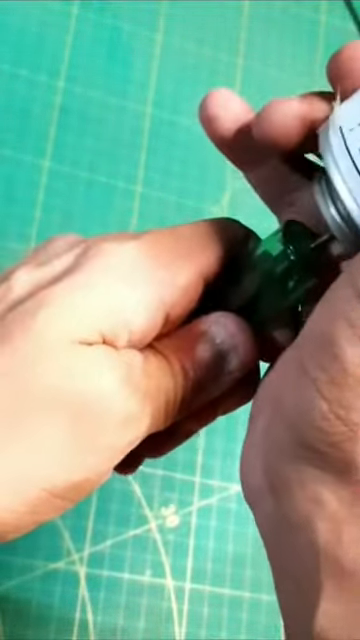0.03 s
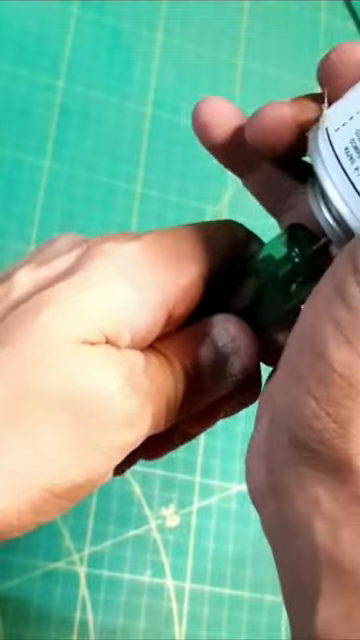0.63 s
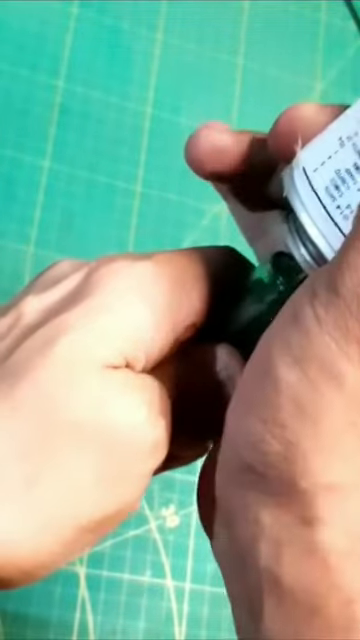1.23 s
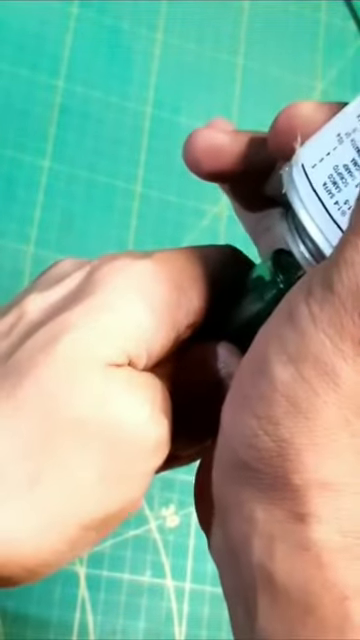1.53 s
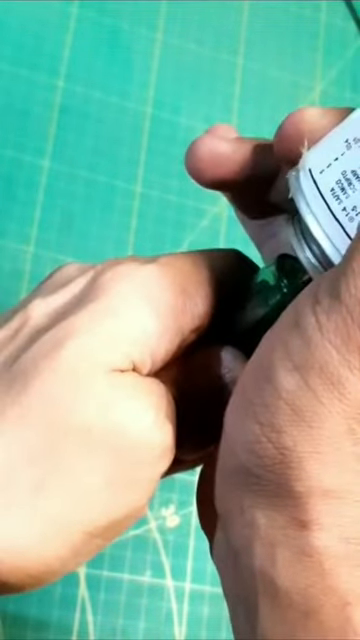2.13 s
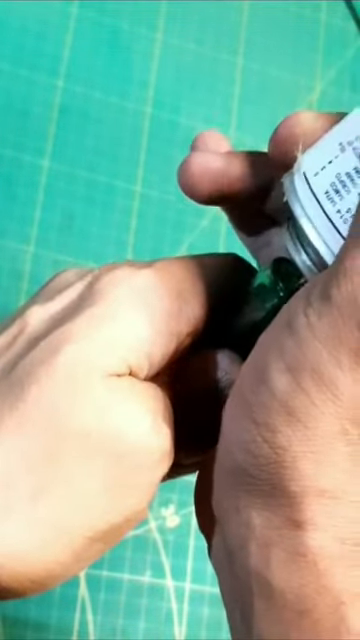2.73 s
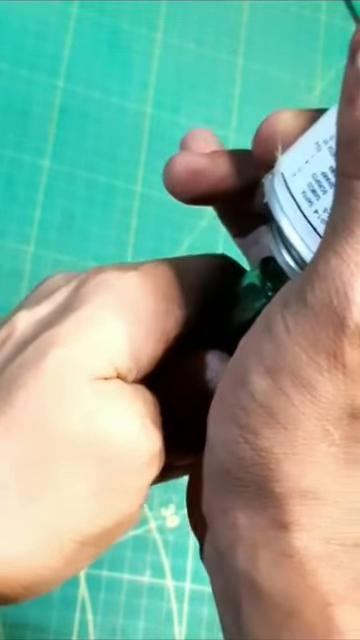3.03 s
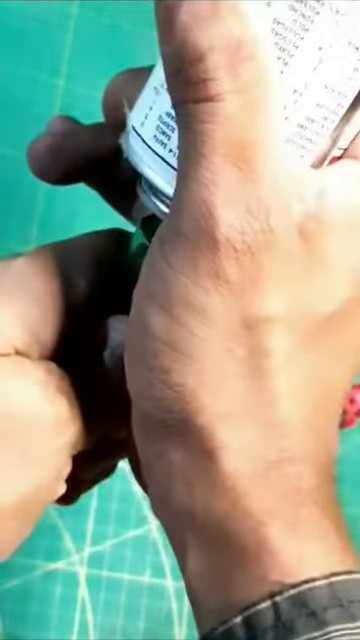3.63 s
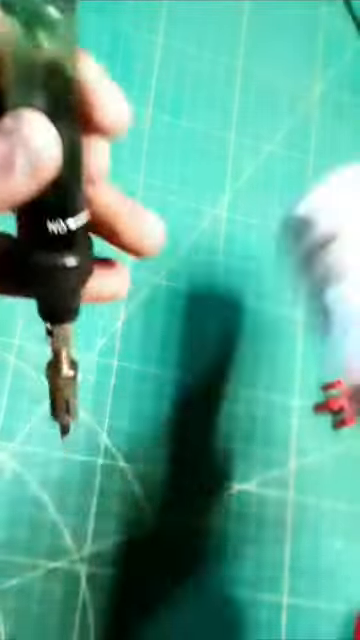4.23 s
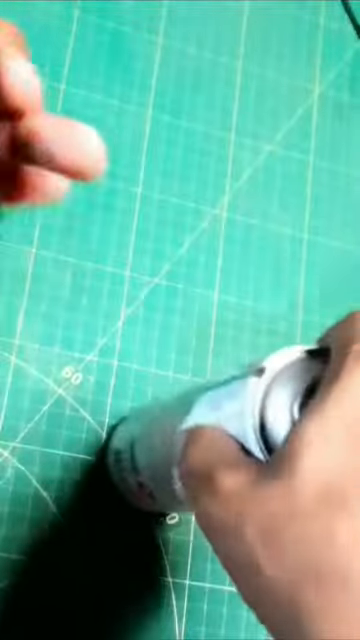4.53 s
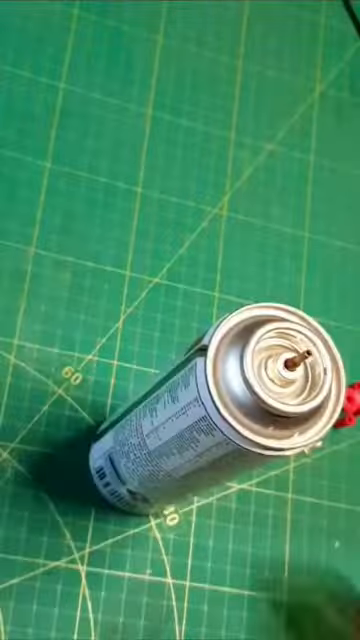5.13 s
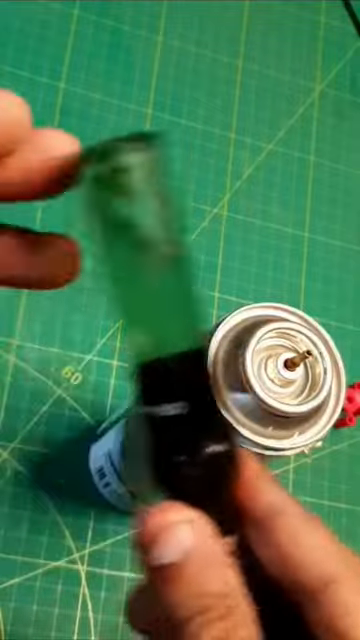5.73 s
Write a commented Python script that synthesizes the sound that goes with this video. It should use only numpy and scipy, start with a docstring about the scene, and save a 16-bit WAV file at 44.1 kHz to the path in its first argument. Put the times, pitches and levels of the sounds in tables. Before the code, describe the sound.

Hands rumble and bump softly at a work table in a small quiet room. A gas can spits sharply as its nozzle seats in a soldering iron's valve, then gives a thin, high, wavering hiss for nearly three seconds. The two part with a snap and a burst of gas that dies away in a puff. The can lands on a mat with a dull knock, and fingers brush off it. Everything sounds close.

```python
"""At a work table in a small quiet room, a gas can is pressed onto a soldering iron's filler valve.
The valve spits as it seats; a turbulent jet then hisses past the nozzle, exciting valve and tank.
The two part with a snap, a burst of released pressure and a dying puff, and the can lands on the mat.
Impacts ring in damped modes, hands rumble and bump through the table, and a faint hiss lies beneath."""
import sys
import numpy as np
from scipy import signal
from scipy.fft import rfft, irfft, next_fast_len
from scipy.io import wavfile
from scipy.ndimage import map_coordinates

SR = 44100
rng = np.random.default_rng(int(sys.argv[2]) if len(sys.argv) > 2 else 0)


def inscribe(sig):
    """Save sig as 16-bit PCM at rate SR to the path in sys.argv[1].

    A 1-D sig is mono; a 2-D sig holds one channel per row.
    Samples are clipped to [-1, 1] before scaling.
    """
    pcm = np.round(np.clip(np.atleast_2d(sig).T, -1, 1) * 32767)
    wavfile.write(sys.argv[1], SR, pcm.astype(np.int16))


N = 263277
T = np.arange(N) / SR
GRIP_RISE_S, GRIP_T60_S = 0.03, 0.29  # every push or stroke swells and relaxes alike


def leak():
    """Flow excitation: gas escaping past the seated nozzle sounds as a jet and drives two cavities."""
    return (jet() + valve_cavity() + tank_cavity()) * gate(1.21, 2.745, 0.0415, 0.12)


def jet():
    """Jet noise: turbulence sings in resonances that wander with the seating, with fizz above them."""
    # strength of the leak as the seating changes: (time [s], relative level [dB])
    leakage = [(1.26, -35.5), (1.4, -37), (1.42, -44), (1.6, -41.5), (1.67, -34.5), (1.76, -42),
               (2.14, -38.5), (2.2, -42), (2.39, -41), (2.41, -35.5), (2.43, -42.5), (2.68, -47),
               (2.77, -42.5), (2.8, -44), (2.88, -43), (3.0, -45), (3.05, -40), (3.07, -44.5),
               (3.17, -38.5), (3.21, -44.5), (3.25, -38.5), (3.27, -44.5), (3.39, -47), (3.52, -44),
               (3.54, -33.5), (3.57, -41), (3.61, -34.5), (3.68, -44), (3.93, -38.5), (3.95, -40)]
    # pitch of the jet as the seating changes: (time [s], centre frequency [Hz])
    seating = [(1.24, 11040), (1.45, 11050), (1.63, 11560), (2.24, 11200), (2.62, 11670), (2.86, 11100),
               (3.04, 11770), (3.22, 11150), (3.55, 11060), (3.73, 11400), (3.95, 11230)]
    # resonances of the jet: (frequency before shifting [Hz], width [Hz], relative level [dB])
    jet_modes = [(10540, 520, -1.5), (11220, 400, 2.5), (11880, 500, .5), (11100, 1630, -2.5)]
    centre_hz = 11300
    tremor_db, tremor_hz, tremor_per_s = 0.35, 108.2, 24  # the nozzle trembles in its seat
    level_db, = curves(leakage)
    seat_hz, = curves(seating)
    # each resonance swells and fades by itself as the gap changes shape
    song = unit(sum(amp(db) * np.sqrt(width) * resonant([(hz, width, 0)], likeness=-0.38)
                    * sputter(depth_db=1.7, rate=13) for hz, width, db in jet_modes))
    song = shifted(song, seat_hz - centre_hz + tremor_hz * wobble(tremor_per_s))
    flutter = sputter(depth_db=2.0, rate=780) * sputter(tremor_db, tremor_per_s)
    fizz = amp(-30 + 0.53 * level_db) * resonant([(14300, 1900, 0)], likeness=-0.1)
    return amp(level_db + 4.5) * song * flutter + fizz


def valve_cavity():
    """Cavity resonance: the gas-filled valve colours the flow noise; its throat shifts in pitch."""
    # loudness of the gas inside the valve: (time [s], relative level [dB])
    drive = [(1.3, -50), (1.48, -49.5), (1.56, -54), (1.56, -44.5), (1.62, -54.5), (1.63, -50.5),
             (1.91, -55.5), (2.0, -52.5), (2.55, -54.5), (2.67, -58.5), (2.76, -52), (3.05, -55.5),
             (3.26, -52), (3.31, -56), (3.37, -51.5), (3.62, -53), (3.82, -58), (3.95, -50.5)]
    # the throat's resonance as the nozzle tilts: (time [s], frequency [Hz])
    throat_pitch = [(1.25, 4940), (1.3, 4610), (1.64, 5254), (1.98, 4890), (2.01, 5165), (2.4, 4920),
                    (2.48, 5255), (2.91, 4770), (3.01, 5220), (3.23, 4777), (3.83, 5180), (3.95, 5330)]
    # the valve full of heavy gas: (frequency [Hz], width [Hz], relative level [dB])
    duct_modes = [(476, 297, -0.5), (2175, 410, -1.5), (2822, 360, -1), (4700, 450, -0.5), (6360, 1500, 0),
                  (9000, 1000, -4)]
    drive_db, = curves(drive)
    throat_hz, = curves(throat_pitch)
    throat = shifted(resonant([(5000, 600, 0)], likeness=0.05), throat_hz - 5000)
    throat = amp(-3) * throat * sputter(depth_db=2.44, rate=13) * panned(-5.0)
    duct = resonant(duct_modes, likeness=-0.068) * panned(-1.5)
    return amp(drive_db + 3) * notched(duct + throat) * sputter(depth_db=1.53, rate=32)


def tank_cavity():
    """Cavity resonance: the tank's hollow note wavers as it fills."""
    # the tank's note: (time [s], frequency [Hz], relative level [dB])
    tank_note = [(1.27, 1905, -59), (1.33, 1628, -48), (1.63, 1797, -57.5), (1.75, 1763, -49.5),
                 (1.93, 1772, -60), (2.02, 1675, -48.5), (2.1, 1670, -57), (2.17, 1650, -48),
                 (2.18, 1706, -62), (2.28, 1832, -60), (2.82, 1697, -55.5), (2.85, 1684, -48),
                 (2.99, 1788, -56.5), (3.03, 1670, -49), (3.07, 1753, -56.5), (3.15, 1703, -49),
                 (3.41, 1708, -57), (3.64, 1664, -53), (3.7, 1765, -63), (3.73, 1780, -51),
                 (3.89, 1750, -59.5), (3.95, 1754, -49)]
    note_hz, note_db = curves(tank_note)
    note = shifted(resonant([(1750, 240, 0)], likeness=-0.1), note_hz - 1750 + 55 * wobble(30))
    return amp(note_db + 3) * note * sputter(depth_db=1.5, rate=35)


def spurts():
    """Two-phase flow: gas and drops of liquid spit out at full pressure until the nozzle seats."""
    # spurts of gas: (start [s], length [s], rise [s], t60 [s], relative level [dB])
    gas_spurts = [(1.112, 0.034, 0.034, 0.041, -46), (1.144, 0.036, 0.0088, 0.067, -28),
                  (1.179, 0.023, 0.0055, 0.22, -21.5), (1.235, 0.025, 0.07, 0.22, -37)]
    # drops cracking through the nozzle: (start [s], length [s], rise [s], t60 [s], relative level [dB])
    drops = [(1.1505, 0.0018, .0006, .012, -31.5), (1.1905, .0025, .0005, 0.0085, -18.5),
             (1.2065, .0015, .0005, .01, -22.5)]
    # the spurt's bright core: (frequency [Hz], width [Hz], relative level [dB])
    core_modes = [(9640, 560, 0), (10630, 450, 2), (11800, 560, 2), (13150, 560, -1), (14300, 400, -10)]
    # valve resonances: (frequency before the glide [Hz], width [Hz], relative level [dB])
    valve_modes = [(356, 360, -8.5), (1627, 324, 4), (2900, 470, -1), (4230, 270, 1), (5220, 400, -1.5),
                   (5800, 300, -1), (7560, 380, 1.5)]
    core = amp(-0.5) * resonant(core_modes, likeness=-0.57)
    valve = amp(-8.5) * sinking(notched(resonant(valve_modes, likeness=-0.27)))
    return (flow(gas_spurts) + flow(drops)) * (core + valve) * sputter(depth_db=1.0, rate=510)


def sinking(x):
    """Resonances scale with the speed of sound, so all glide down as the slower fuel gas enters."""
    # heavy gas displaces the air in the valve: (time [s], frequency ratio [1])
    glide = [(1.15, 1.21), (1.18, 1.185), (1.2, 1.105), (1.28, 0.98)]
    ratio, = curves(glide)
    oversampled = signal.resample_poly(x, 2, 1, axis=1)
    return np.array([map_coordinates(c, [2 * np.cumsum(ratio)], mode="mirror") for c in oversampled])


def notched(x):
    """Antiresonance: the valve cancels two bands of the sound."""
    # the valve's nulls: (frequency [Hz], width [Hz])
    nulls = [(3680, 430), (6800, 120)]
    return filtered(x, lambda f: np.prod([1 - np.exp(-((f - hz) / w) ** 2) for hz, w in nulls], axis=0))


def burst():
    """Sudden decompression: the seal breaks and the pressure in the nozzle escapes at once."""
    # pulses as the nozzle leaves: (start [s], length [s], rise [s], t60 [s], level [dB])
    pulses = [(3.972, 0.0056, 0.0021, 0.016, -18), (3.9795, 0.0055, .002, 0.017, -17.5),
              (3.987, 0.0041, .002, 0.15, -27)]
    # resonances of the open valve: (frequency [Hz], width [Hz], relative level [dB])
    open_modes = [(1700, 350, 3), (2880, 400, -1.5), (5730, 1700, -1.5), (7390, 460, 4), (8900, 700, 2),
                  (10200, 820, 14), (12700, 445, 1), (13900, 1500, -1.5), (14970, 400, -6.5)]
    return flow(pulses) * resonant(open_modes, likeness=-0.039)


def vent():
    """Pressure decay: the last gas trapped in the valve leaves in weakening puffs."""
    # puffs: (start [s], length [s], rise [s], t60 [s], level [dB])
    puffs = [(3.993, 0.0085, 0.0095, 0.27, -35.5), (4.02, 0.07, 0.056, 0.3, -37),
             (4.15, 0.025, 0.023, 0.41, -44.5)]
    # spectrum of the escaping gas: (frequency [Hz], relative level [dB])
    spectrum = [(710, -50), (1200, -13), (1390, -22.5), (2030, -9), (3050, -16), (4770, 1), (6650, -3),
                (7900, -8), (10700, 0), (14200, -5.5), (15500, -8)]
    return flow(puffs) * noise(spectrum) * sputter(depth_db=1.0, rate=300)


def snap():
    """Impulse excitation: the nozzle jumps out of the valve with a broadband crack and a short ring."""
    # modes of the snap: (frequency [Hz], relative level [dB], t60 [s])
    modes = [(205, -30, .136), (1750, -1, .0058)]
    # spectrum of the crack: (frequency [Hz], relative level [dB])
    spectrum = [(300, -13), (900, -7), (1500, -5), (2350, -8.5), (3100, -11), (6300, -17), (9000, -28),
                (15000, -50)]
    start_s, hold_s, rise_s = 3.968, 0.0013, 0.00024
    crack = amp(-11.5) * noise(spectrum) * gate(start_s, hold_s, rise_s, t60=0.022)
    blow = amp(-14.5) * (ring(start_s, modes, hold_s, rise_s, lead_rad=1.2) + crack)
    return blow + amp(-14) * room(blow)


def landing():
    """Damped impact: the can meets the mat with a dull knock, then its rim chatters to rest."""
    # the can's base, damped by the mat: (frequency [Hz], relative level [dB], t60 [s])
    base_modes = [(130, -24, .1), (630, -16, 0.028), (1470, 0.5, 0.0059), (2310, -11, 0.0081),
                  (6250, -26, .025)]
    # resonances of the rim: (frequency [Hz], width [Hz], relative level [dB])
    rim_modes = [(1500, 440, -1), (2050, 720, -4), (4360, 480, -11), (6200, 440, -11)]
    start_s = 4.594
    blow = amp(-23.5) * ring(start_s, base_modes, hold_s=0.00088, rise_s=0.00038, lead_rad=-0.42)
    chatter = amp(-46.5) * resonant(rim_modes, likeness=0.31) * sputter(depth_db=1.5, rate=300)
    contact = blow + chatter * gate(start_s, 0.031, 0.02, 0.15)
    return contact + amp(-13) * room(contact)


def tap():
    """Free vibration: the iron rings briefly after a soft knock from a fingertip."""
    # the iron's plastic body: (frequency [Hz], relative level [dB], t60 [s])
    body_modes = [(204, -4, 0.14), (664, -3, 0.024), (830, -7, .02), (1250, 1.5, 0.019),
                  (2300, -15.5, .007)]
    blow = amp(-31.5) * ring(0.3883, body_modes, hold_s=0.0037, rise_s=0.0012, lead_rad=1.0)
    return blow + amp(-17.5) * room(blow)


def ticks():
    """Brief contacts have wide spectra: light touches of nozzle and fingers tick brightly."""
    # touches: (start [s], level [dB], length [s])
    touches = [(4.273, -40, 0.007), (4.331, -41, .0015)]
    # spectrum of a tick: (frequency [Hz], relative level [dB])
    spectrum = [(3000, -18.5), (5000, -1), (6400, 5.5), (8500, -17), (11000, 5.5), (15000, -17)]
    return noise(spectrum) * sum(amp(db) * gate(s, length, 0.00048, 0.035) for s, db, length in touches)


def hands():
    """Structure-borne sound: gripping hands rumble through the table; the same effort drives rubbing."""
    # pushes and shifts of grip: (start [s], length [s], level [dB], left minus right [dB])
    grips = [(-.02, 0.048, -43, -1.5), (0.389, 0.095, -41.5, -6.5), (0.547, 0.16, -43, -11),
             (0.748, 0.1, -34, -10.5), (1.119, 0.11, -39.5, -11), (1.38, 0.069, -46.5, -18),
             (1.594, 0.04, -49.5, -12), (1.887, .14, -45, -13), (2.096, 0.057, -43.5, -7.5),
             (2.454, .05, -47.5, 7), (2.616, 0.056, -44.5, -24), (2.715, 0.031, -35.5, -3),
             (2.807, 0.15, -43.5, -18), (3.126, 0.061, -35, 4), (3.285, 0.096, -35.5, -16),
             (3.806, 0.13, -37, -6.5), (3.991, 0.052, -38, -4.5), (4.102, 0.086, -46, -10),
             (4.162, 0.05, -36.5, -4.5), (4.251, 0.096, -36.5, -28), (4.384, .12, -36.5, -13),
             (4.548, 0.095, -46.5, -26), (5.486, 0.15, -51, -11), (5.66, 0.036, -49, -24),
             (5.766, 0.036, -56.5, -23)]
    # spectrum of the rumble: (frequency [Hz], relative level [dB])
    rumble_spectrum = [(20, -3), (45, 1.5), (75, 1), (120, -1), (165, -5), (205, -4.5), (255, -13),
                       (450, -18), (700, -52), (1200, -45), (2500, -81.5)]
    # spectrum of rubbing skin: (frequency [Hz], relative level [dB])
    rub_spectrum = [(120, -16), (220, -8), (340, 0.5), (460, -2), (700, -8), (1100, -19), (2000, -31.5),
                    (4000, -58)]
    tremor = amp(-60.5) * sputter(depth_db=5, rate=7.6) * gate(0, 5.2, 0.01, 0.69) * panned(-2.5)
    effort = np.sqrt(tremor ** 2 + sum(push ** 2 for push in strokes(grips)))
    rumble = effort * noise(rumble_spectrum) * sputter(depth_db=2.0, rate=30)
    friction = amp(-31.5) * effort.mean(axis=0) ** 0.51  # skin rubs louder under a harder push
    rub = friction * noise(rub_spectrum) * sputter(depth_db=2.6, rate=30) * hush(drop_db=-20.0)
    return rumble + rub


def bumps():
    """Heavily damped motion: each bump of a hand is a single swing with no ring."""
    # bumps: (centre time [s], peak level [dB], frequency [Hz], left minus right [dB])
    knocks = [(0.798, -30, 61.7, -14), (.823, -29, 112, -2), (1.059, -39.5, 67, 5), (1.921, -42, 65, -11),
              (2.003, -35, 60, -8), (2.137, -34, 80, 4), (2.688, -29.5, 58.9, -7), (2.741, -26, 99.7, -6),
              (3.173, -20.5, 124, 17), (3.312, -34, 81.7, -17), (3.379, -30, 85, -12),
              (4.026, -25.5, 85.9, 6), (4.189, -28, 79.6, 6), (4.298, -28, 79, -22),
              (4.464, -31, 70.5, -22), (4.498, -30, 48, -8.5), (5.534, -41, 70.5, -14.5),
              (5.714, -40.5, 94.6, -16)]
    swing = lambda phase: phase * np.exp((1 - phase ** 2) / 2)
    return sum(amp(db) * panned(pan) * swing(2 * np.pi * hz * (T - s)) for s, db, hz, pan in knocks)


def slides():
    """Sliding friction: fingers brush off the can with no weight behind them."""
    # finger strokes: (start [s], length [s], level [dB], left minus right [dB])
    brushes = [(4.775, 0.07, -51, -9), (4.944, 0.11, -50, -2.5), (5.065, 0.039, -52, -4)]
    # spectrum of the brushing: (frequency [Hz], relative level [dB])
    spectrum = [(30, -30), (90, 5.5), (190, 2), (400, -4), (700, -19), (1500, -39), (4000, -49.5)]
    return sum(strokes(brushes)) * noise(spectrum) * sputter(depth_db=4.5, rate=40)


def nearby(x, echo_db, count=8):
    """Comb filtering: weak reflections from hands, can and table ripple the spectrum."""
    delays_s = rng.uniform(0.000759, 0.014, (count, 2, 1))
    comb = lambda hz: 1 + amp(echo_db) * np.exp(-2j * np.pi * hz * delays_s).sum(0)
    return filtered(x, comb) / np.sqrt(1 + count * amp(echo_db) ** 2)


def room(x):
    """Reverberation: the small room's diffuse tail decays exponentially, the treble first."""
    # reverberation time: (frequency [Hz], t60 [s])
    decay = [(200, .2), (2000, 0.26), (12000, 0.041)]
    hz, t, spectra = signal.stft(rng.standard_normal((2, SR // 3)), SR, nperseg=256)
    tail = signal.istft(spectra * amp(-60 * t / along(decay, hz)[:, None]), SR, nperseg=256)[1]
    return signal.fftconvolve(x, tail / np.linalg.norm(tail[0]), axes=1)[:, :N]


def air():
    """Noise floor: a broadband hiss holds a faint narrow-band whistle that drifts in pitch."""
    # spectrum of the hiss: (frequency [Hz], relative level [dB])
    spectrum = [(25, 1), (150, 7), (650, 6.5), (1300, 3), (2100, 2), (2800, -1), (3900, -6), (5000, 2),
                (6800, 0), (8400, -20.5), (9200, -10), (11400, -2), (12400, -11.5), (15200, -3.5)]
    whistle = shifted(resonant([(2084, 310, 0)], likeness=0.2), 64.94 * wobble(11))
    whistle = amp(-10.5) * whistle * sputter(depth_db=3.5, rate=22)
    return amp(-54) * hush(drop_db=-10.5) * (noise(spectrum) + whistle)


def hush(drop_db):
    """Attenuation: the background hiss and faint rubbing step down abruptly near the end."""
    step_down_s, ramp_s = 4.878, 0.0027
    return amp(drop_db * np.clip((T - step_down_s) / ramp_s, 0, 1))


def ring(start, modes, hold_s, rise_s, lead_rad):
    """Modal superposition: damped sines, with the left channel ahead in phase by lead_rad."""
    phase = np.array([[0.5], [-0.5]]) * lead_rad
    return sum(amp(db) * np.sin(2 * np.pi * hz * (T - start) + phase) * gate(start, hold_s, rise_s, t60)
               for hz, db, t60 in modes)


def resonant(modes, likeness):
    """Resonance peaks shape noise of rms 1; likeness is the correlation of left and right."""
    power = lambda f: sum(amp(db) ** 2 / (1 + 2 * ((f - hz) / width) ** 2) ** 2 for hz, width, db in modes)
    mid, side = filtered(rng.standard_normal((2, N)), lambda f: np.sqrt(power(f)))
    angle = np.arccos(likeness) / 2
    return unit(np.cos(angle) * mid + np.sin(angle) * np.array([side, -side]))


def noise(spectrum):
    """Spectral shaping: coloured noise of rms 1, uncorrelated between left and right."""
    return unit(filtered(rng.standard_normal((2, N)), lambda hz: amp(along(spectrum, hz))))


def shifted(x, shift_hz):
    """Single-sideband modulation slides a band by a changing number of Hz."""
    analytic = signal.hilbert(x, next_fast_len(N))[:, :N]
    return np.real(analytic * np.exp(2j * np.pi * np.cumsum(shift_hz) / SR))


def filtered(x, response):
    """Linear filtering: the spectrum of x times a response of frequency."""
    size = next_fast_len(N + SR // 2)
    return irfft(rfft(x, size) * response(np.fft.rfftfreq(size, 1 / SR)), size)[..., :N]


def flow(escapes):
    """Summed envelope of a series of gas escapes."""
    return sum(amp(db) * gate(s, length, rise, t60) for s, length, rise, t60, db in escapes)


def strokes(moves):
    """One stereo envelope for each movement of the hand."""
    return [amp(db) * gate(s, length, GRIP_RISE_S, GRIP_T60_S) * panned(pan)
            for s, length, db, pan in moves]


def gate(start, length, rise, t60):
    """Linear rise, then exponential decay from start + length on; all in seconds."""
    t = T - start
    return np.clip(t / rise, 0, 1) * amp(-60 * np.maximum(t - length, 0) / t60)


def sputter(depth_db, rate):
    """Random amplitude modulation, as a gain of rms 1."""
    return unit(amp(depth_db * wobble(rate)))


def wobble(rate):
    """A smooth random curve with rate knots a second."""
    return map_coordinates(rng.standard_normal(int(N * rate / SR) + 4), [T * rate])


def panned(pan_db):
    """Constant-power panning: left and right gains that differ by pan_db."""
    gains = amp(np.array([[0.5], [-0.5]]) * pan_db)
    return gains / np.sqrt(np.mean(gains ** 2, axis=0))


def curves(rows):
    """One value per sample for each column after the time."""
    times, *columns = np.transpose(rows)
    return [np.interp(T, times, column) for column in columns]


def along(points, hz):
    """(frequency [Hz], value) points read on a logarithmic axis."""
    knots_hz, values = np.transpose(points)
    return np.interp(np.log(hz + 1), np.log(knots_hz + 1), values)


def unit(x):
    """Scale to rms 1."""
    return x / np.sqrt(np.mean(x ** 2) + 1e-20)


def amp(db):
    """Decibels to gain."""
    return 10 ** (np.asarray(db) / 20)


def scene():
    """Superposition of the gas, its reflections, the contacts, the hands and the background."""
    gas = nearby(leak() + vent() + spurts(), echo_db=-12.0) + burst()
    reverberation = amp(-20.5) * room(gas)
    contacts = tap() + snap() + landing() + ticks()
    return gas + reverberation + contacts + hands() + bumps() + slides() + air()


def record(dry):
    """Band limiting: an ideal low-pass filter removes the highest treble."""
    return filtered(dry, lambda hz: hz < 15550)


dry = scene()
out = record(dry)
inscribe(out)
```